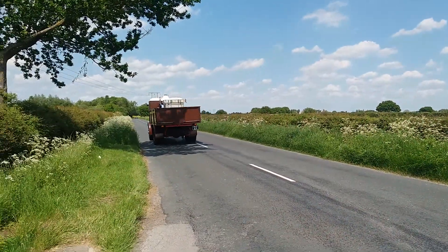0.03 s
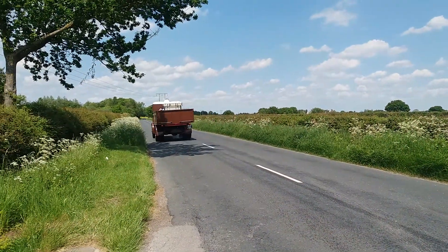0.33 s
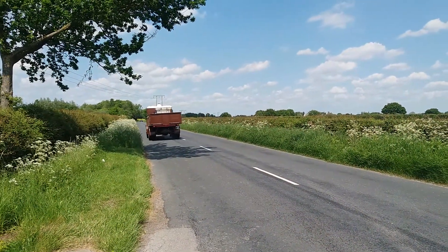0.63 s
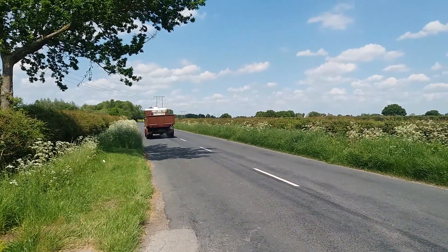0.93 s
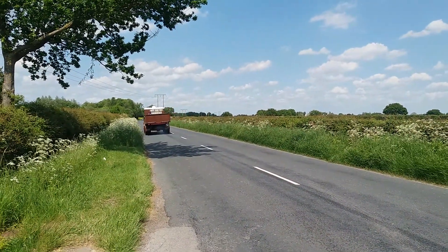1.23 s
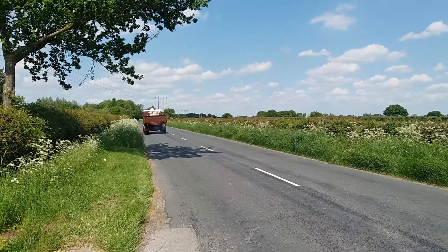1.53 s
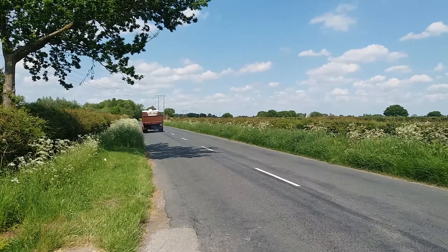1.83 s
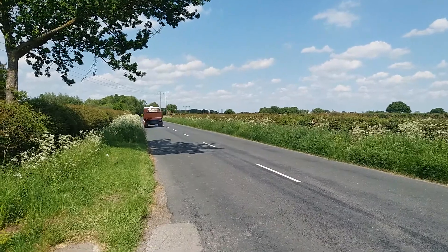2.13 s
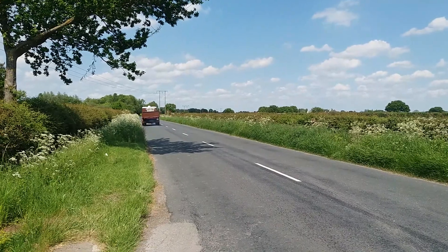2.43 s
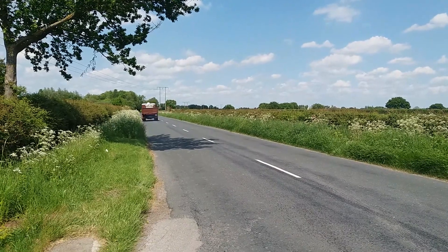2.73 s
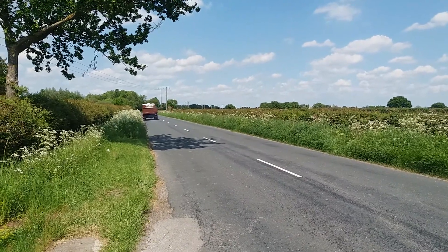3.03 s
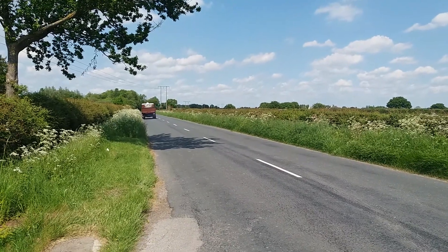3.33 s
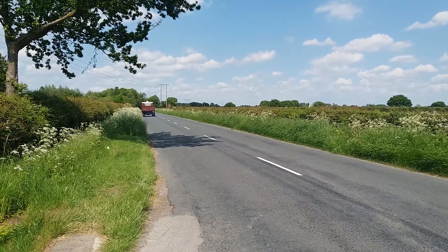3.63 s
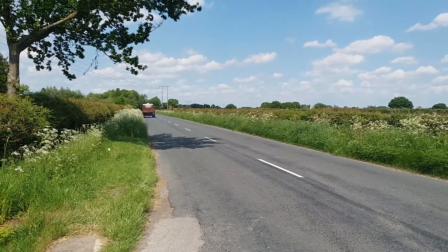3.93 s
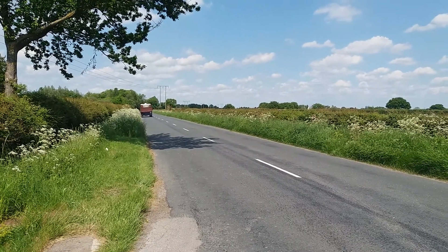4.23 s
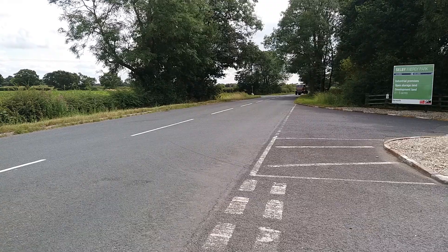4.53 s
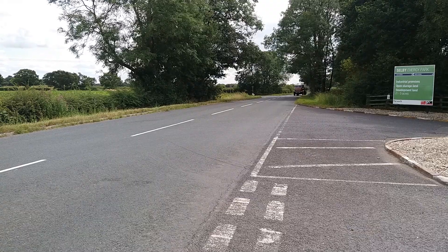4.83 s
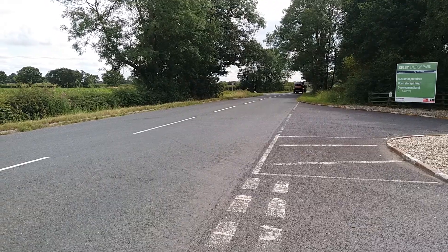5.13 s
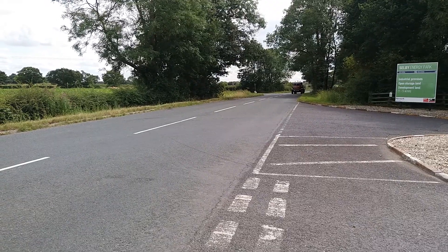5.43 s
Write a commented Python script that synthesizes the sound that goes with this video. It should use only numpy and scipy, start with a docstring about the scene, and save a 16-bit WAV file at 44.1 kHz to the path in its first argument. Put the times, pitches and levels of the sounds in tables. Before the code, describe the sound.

A diesel lorry drives off with engine rumble, tyre roar and bumps; after a brief silence, another hums steadily farther away.

```python
"""An old four-cylinder diesel lorry drives away along a country road at nearly steady revs.
Exhaust pulses drone, tyres roar, firings rattle the engine panels; from 0.3 s bumps thump the wagon body.
The engine's hiss swirls in the breeze and fades, thin whistles come and go, reflection dips deepen.
At 4.46 s the sound cuts off. After a short silence a second, more distant lorry fades in on
another road and holds."""
import sys
import numpy as np
from scipy import signal
from scipy.fft import rfft, irfft
from scipy.io import wavfile
from scipy.ndimage import uniform_filter1d

SR = 44100
rng = np.random.default_rng(int(sys.argv[2]) if len(sys.argv) > 2 else 0)


def master_out(mix):
    """Clip the mix to full scale and print it as 16-bit PCM to the path in sys.argv[1]."""
    frames = np.transpose(np.atleast_2d(mix))
    ceiling = np.clip(frames, -1, 1)
    pcm = np.round(ceiling * 32767).astype(np.int16)
    wavfile.write(sys.argv[1], SR, pcm)


N = 246519


def from_db(db):
    return 10 ** (np.asarray(db) / 20)


def rms_one(x):
    return x / np.sqrt(np.mean(x ** 2) + 1e-20)


def seconds():
    return np.arange(N) / SR


def in_time(curve):
    return np.interp(seconds(), *np.transpose(curve))


def drift(rate_hz):
    """Slow random wander, rms 1."""
    pole = np.exp(-80 * np.pi * rate_hz / SR)
    noise = rng.standard_normal(N // 40 + 2002)  # one value per 40 samples
    slow = signal.lfilter([1], [1, -2 * pole, pole * pole], noise)[2000:]
    return np.interp(np.arange(N) / 40, np.arange(len(slow)), rms_one(slow))


def coloured(x, spectrum):
    """Spectral shaping with steep skirts past both ends; rms 1, so table levels are relative."""
    hz, db = np.transpose(spectrum)
    f = np.maximum(np.arange(N // 2 + 1) * SR / N, 1)
    skirts = 1 / np.sqrt((1 + (hz[0] / f) ** 16) * (1 + (f / hz[-1]) ** 16))
    gain = from_db(np.interp(np.log(f), np.log(hz), db))
    return rms_one(irfft(rfft(x) * skirts * gain, N))


def resonator(hz, width_hz):
    """Band-pass coefficients, peak gain 1."""
    r = np.exp(-np.pi * width_hz / SR)
    return (1 - r * r) / 2 * np.array([1, 0, -1]), [1, -2 * r * np.cos(2 * np.pi * hz / SR), r * r]


def gliding(x, centre_hz, width_hz, block=512):
    """Resonance with a moving centre."""
    band, state = np.zeros(N), np.zeros(2)
    for i in range(0, N, block):
        b, a = resonator(centre_hz[i], width_hz)
        band[i:i + block], state = signal.lfilter(b, a, x[i:i + block], zi=state)
    return band


def ring(force, hz, t60_s):
    """One mode: a unit push starts a decaying unit sine."""
    r, w = from_db(-60 / (t60_s * SR)), 2 * np.pi * hz / SR
    return signal.lfilter([0, np.sin(w)], [1, -2 * r * np.cos(w), r * r], force + 1e-18)


def puffs(cycles, depth, flutter_db):
    """Noise swelling once a cycle, with optional level flutter."""
    swell = np.exp(depth * np.cos(2 * np.pi * cycles))
    return rms_one(rng.standard_normal(N) * swell * from_db(flutter_db * drift(17.7)))


def pipe_drone(turns, orders, waver_db, jitter_turns, smear_rad):
    """One pulse a turn, smeared by the pipe; uneven firing shakes the higher lines most."""
    shaken = turns + jitter_turns * drift(20)
    lines = np.zeros(N)
    for k, db in orders:
        gain = from_db(db + waver_db * np.log(k) * drift(5.1))
        lines += gain * np.cos(2 * np.pi * k * shaken - smear_rad * k * k)
    return rms_one(lines)


# noise floor spectrum: f/Hz, level/dB
FLOOR_SPECTRUM = [(2000, -0.5), (9000, -2), (15700, -1.5)]
def microphone_hiss():
    """Faint, steady noise floor."""
    return from_db(-79.5) * coloured(rng.standard_normal(N), FLOOR_SPECTRUM)


# exhaust noise spectrum: f/Hz, level/dB
RUMBLE_SPECTRUM = [(20, -27), (36, -30.5), (52, -17), (66, -10), (87, 1), (115, -4.5), (145, -4),
                   (168, -1.5), (195, -5.5), (250, -6.5), (300, -14.5), (350, -17.5), (500, -42)]
def rumble(turns, depth):
    """Low exhaust noise of either lorry, one puff a turn."""
    return coloured(puffs(turns, depth, flutter_db=1.0), RUMBLE_SPECTRUM)


# exhaust lines: crank order, level/dB
FAR_EXHAUST_LINES = [(2, 0), (3, 0), (4, -5), (6, -0.5), (7, -5), (8, -15), (9, -12), (15, -12.5),
                     (17, -16)]
# tyre and hiss spectra: f/Hz, level/dB
FAR_TYRE_SPECTRUM = [(180, -35), (300, -8), (358, -7), (401, -2), (499, -8), (548, -3), (704, -6.5),
                     (765, -5), (1000, -10.5), (1220, -6.5), (2160, -10), (2480, -11.5), (3600, -31.5),
                     (4680, -63), (7920, -120)]
FAR_HISS_SPECTRUM = [(1940, -36), (3300, -8), (3450, -13), (3760, -12), (4280, -1.5), (4390, 0),
                     (5190, -9.5), (5650, -9), (6560, -24), (7760, -13), (8890, -17.5), (10200, -20.5),
                     (15500, -20)]
def far_lorry(crank_hz=31.3, start_s=4.807, fade_s=0.37):
    """Second lorry: lower revs, most of the treble lost to distance."""
    turns = crank_hz * seconds()
    fade_in = np.clip((seconds() - start_s) / fade_s, 0, 1)
    drone = pipe_drone(turns, FAR_EXHAUST_LINES, waver_db=0.5, jitter_turns=0.0054, smear_rad=0.3)
    exhaust = from_db(-41.6) * drone + from_db(-43.6) * rumble(turns, depth=0.35)
    tyres = from_db(-42.55) * coloured(puffs(2 * turns, depth=0.094, flutter_db=0), FAR_TYRE_SPECTRUM)
    hiss = from_db(-57) * coloured(puffs(2 * turns, depth=0.11, flutter_db=0.2), FAR_HISS_SPECTRUM)
    return fade_in * (exhaust + tyres + hiss)


# whistles: peak t/s, half-length/s, f/Hz, width/Hz, level/dB
GEAR_WHISTLES = [(1.1, .9, 3710, 32, -43.5), (0.75, 0.11, 4420, 220, -37), (2.248, 0.59, 4356, 190, -43),
                 (2.89, 0.086, 6893, 400, -48.5), (3.63, .1, 6940, 400, -51),
                 (3.928, 0.054, 6940, 200, -61), (4.202, 0.11, 6640, 300, -57)]
def whistles():
    """Narrow running-gear resonances swell and die away."""
    out = np.zeros(N)
    for peak_s, half_s, hz, width_hz, db in GEAR_WHISTLES:
        b, a = resonator(hz, width_hz)
        band = signal.lfilter(b, a, rng.standard_normal(N))
        tone = rms_one(signal.lfilter(b, a, band))
        out += from_db(db) * tone * np.exp(-2 * ((seconds() - peak_s) / half_s) ** 2)
    return out


# swirl band centre: t/s, f/Hz
SWIRL_CENTRE = [(0, 10800), (.35, 13800), (.52, 9800), (.75, 9600), (.92, 11900), (1.33, 11100),
                (1.53, 13900), (1.8, 11100), (2.45, 12200), (3.5, 9400)]
def swirl(x, width_hz=1600, bypass_db=-9, wander_hz=350):
    """Moving air favours one wandering treble band; rms held at 1."""
    centre_hz = in_time(SWIRL_CENTRE) + wander_hz * drift(4.3)
    mixed = gliding(x, centre_hz, width_hz) + from_db(bypass_db) * x
    return mixed / np.sqrt(uniform_filter1d(mixed ** 2, SR // 10) + 1e-12)


# sizzle spectrum: f/Hz, level/dB
SIZZLE_SPECTRUM = [(8500, 6.5), (9420, 6), (10400, -1), (11400, 1), (13000, -5.5), (15500, -4)]
# sizzle envelope: t/s, level/dB
SIZZLE_ENVELOPE = [(0, -44), (.3, -39.5), (.75, -40), (1.33, -45.5), (1.53, -49), (1.83, -48), (2.47, -53),
                   (2.72, -60.5), (3.5, -59), (3.9, -69)]
def sizzle(turns):
    """Top treble: pulses with the firing, swirls, surges unevenly."""
    level_db = in_time(SIZZLE_ENVELOPE) + 1.27 * drift(2.7)
    noise = coloured(puffs(2 * turns, depth=0.1, flutter_db=1.2), SIZZLE_SPECTRUM)
    return from_db(level_db) * swirl(noise)


def driving_away_db(top_db, rise_db, rise_s, hold_until_s, fade_db_per_s):
    """Level rises as the tail turns to the listener, holds, then sinks with distance."""
    t = seconds()
    return top_db - rise_db * np.maximum(1 - t / rise_s, 0) - fade_db_per_s * np.maximum(t - hold_until_s, 0)


# hiss spectrum: f/Hz, level/dB
HISS_SPECTRUM = [(1350, -39.5), (2300, -4.5), (2420, -20), (2710, -6.5), (3260, -8.5), (3610, 0), (4290, 3),
                 (5090, -1), (5900, -13), (7080, -6), (7630, -8.5), (8600, -21), (9000, -20.5),
                 (11700, -42.5), (19800, -120)]
# hiss swells: peak t/s, half-length/s, boost/dB
HISS_SWELLS = [(3.147, 0.14, 2.6), (3.52, 0.14, 9)]
def engine_hiss(turns):
    """Hiss pulsing with the firing; swells twice as it fades."""
    level_db = driving_away_db(top_db=-33.5, rise_db=8, rise_s=0.22, hold_until_s=0.56, fade_db_per_s=3)
    for peak_s, half_s, boost_db in HISS_SWELLS:
        level_db += boost_db * np.exp(-((seconds() - peak_s) / half_s) ** 2)
    return from_db(level_db) * coloured(puffs(2 * turns, depth=0.12, flutter_db=0.5), HISS_SPECTRUM)


def flicker(x, depth=0.23, width_hz=350):
    """Turbulent air makes each narrow treble band rise and fall on its own."""
    bands = (signal.lfilter(*resonator(hz, width_hz), x) for hz in np.geomspace(3000, 12000, 16))
    return x + depth * sum(drift(6.0) * band for band in bands)


# engine panel modes: f/Hz, width/Hz, level/dB
PANEL_MODES = [(546, 50, -5.5), (1279, 80, 1.5), (2020, 170, 4.5)]
def clatter(turns, sharpness=0.65, uneven_db=0.6):
    """Two firings a turn, each a noise burst ringing the engine panels."""
    strength = from_db(uneven_db * drift(44))
    knocks = rng.standard_normal(N) * np.exp(-sharpness * (2 * turns % 1)) * strength
    panels = np.zeros(N)
    for hz, width_hz, db in PANEL_MODES:
        panels += from_db(db) * rms_one(signal.lfilter(*resonator(hz, width_hz), knocks))
    return rms_one(panels)


# tyre spectrum: f/Hz, level/dB
TYRE_SPECTRUM = [(190, -28.5), (330, -9.5), (350, -13), (426, -2.5), (471, -4.5), (539, -2), (592, -4),
                 (783, -2.5), (1000, -9), (1280, -2), (1780, -6), (1990, -1), (2130, -3.5), (2300, -21),
                 (2500, -11.5), (3100, -17), (3700, -12), (5500, -43)]
# tyre and clatter envelope: t/s, level/dB
ROAR_ENVELOPE = [(0, -33.5), (.33, -28.5), (.7, -29.5), (1.45, -33.5), (2.15, -34.5), (3.2, -30.8),
                 (4.45, -33)]
def roar(turns):
    """Tyre noise with diesel clatter beneath it."""
    tyres = from_db(-0.26) * coloured(puffs(turns, depth=0.053, flutter_db=0.7), TYRE_SPECTRUM)
    return from_db(in_time(ROAR_ENVELOPE)) * (tyres + from_db(-9) * clatter(turns))


# road bumps: t/s, blow level/dB, favoured f/Hz
ROAD_BUMPS = [(0.31, -18.5, 90.5), (0.49, -16.5, 176), (0.603, -14.5, 160.4), (0.921, -18.5, 170),
              (1.02, -12, 88), (1.090, -18.5, 130), (1.122, -11.5, 70), (1.609, -18, 105), (1.8, -18, 220),
              (3.528, -17, 126), (3.83, -33, 75), (4.021, -23, 164.9)]
# wagon body modes: f/Hz, level/dB, t60/s
BODY_MODES = [(55, -5.5, 0.11), (84, -1, 0.14), (122.8, -3, 0.14), (151.4, -2, .13), (215, -4, 0.076)]
def thumps(contact_hz=320, falloff_db_per_octave=14):
    """Each bump is a soft blow through the springs, favouring some body modes."""
    bump_s, blow_db, favoured_hz = np.transpose(ROAD_BUMPS)
    body = np.zeros(N)
    for k, (hz, mode_db, t60_s) in enumerate(BODY_MODES):
        octaves_off = np.abs(np.log2(hz / favoured_hz))
        force = np.zeros(N)
        force[(bump_s * SR).astype(int)] = from_db(blow_db + mode_db - falloff_db_per_octave * octaves_off)
        body += (-1) ** k * ring(force, hz, t60_s)
    return signal.sosfilt(signal.butter(2, [48, contact_hz], "band", fs=SR, output="sos"), body)


# exhaust lines: crank order, level/dB
NEAR_EXHAUST_LINES = [(2, 0), (2.5, -17), (3, -2), (4.5, -11.5), (5, 0.7), (6, 0), (7, -6.5), (9, -14),
                      (11, -20)]
def near_exhaust(turns):
    """Pipe drone plus rumble, moving away."""
    level_db = driving_away_db(top_db=-24, rise_db=5.5, rise_s=0.45, hold_until_s=1.11, fade_db_per_s=2.5)
    drone = pipe_drone(turns, NEAR_EXHAUST_LINES, waver_db=1.67, jitter_turns=0.0019, smear_rad=0.201)
    return from_db(level_db) * (from_db(-2.54) * drone + from_db(-4.5) * rumble(turns, depth=0.25))


# reflection dips: f/Hz, width/Hz, full depth/0-1
REFLECTION_DIPS = [(2370, 140, 0.4), (5930, 880, 0.7), (8710, 750, 0.8), (10400, 540, 0.6),
                   (12800, 910, .55)]
def reflections(x, deepen_s=4.3, ground_hz=288, climb_hz_per_s=45, ground_depth=0.52):
    """Road and hedge reflections cancel more with distance; the road's low dip also climbs."""
    t = seconds()
    grazing = np.clip(0.069 + t / deepen_s, 0, 1)
    for hz, width_hz, depth in REFLECTION_DIPS:
        x = x - depth * grazing * signal.lfilter(*resonator(hz, width_hz), x)
    return x - ground_depth * grazing * gliding(x, ground_hz + climb_hz_per_s * t, width_hz=190)


# crank rate: t/s, f/Hz
CRANK_RATE = [(0, 34.1), (3.55, 35), (4.0, 33.8), (4.45, 33)]
def near_lorry():
    """First lorry: one crank times the exhaust, clatter and treble."""
    turns = np.cumsum(in_time(CRANK_RATE)) / SR
    treble = flicker(engine_hiss(turns) + sizzle(turns))
    airborne = near_exhaust(turns) + roar(turns) + treble
    return reflections(airborne) + whistles() + thumps()


def scene(cut_s=4.463, cut_fade_s=0.004):
    """Near lorry over faint hiss, cut, silence, far lorry; mono."""
    gate = np.clip((cut_s - seconds()) / cut_fade_s, 0, 1)
    near = near_lorry() + microphone_hiss()
    return (gate * near + far_lorry())[None]


def record(dry, cutoff_hz=15700):
    """Steep low-pass."""
    return signal.sosfilt(signal.ellip(12, 0.1, 90, cutoff_hz, fs=SR, output="sos"), dry)


dry = scene()
out = record(dry)
master_out(out)
```